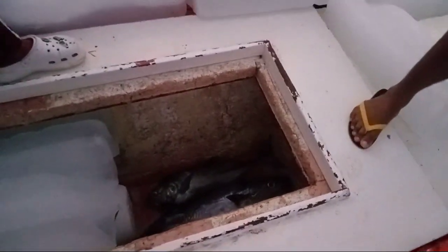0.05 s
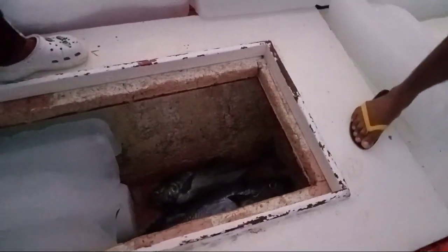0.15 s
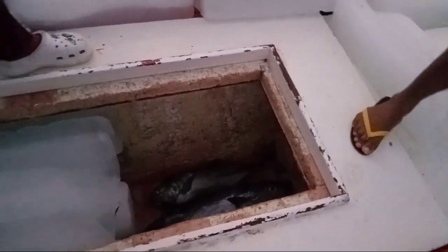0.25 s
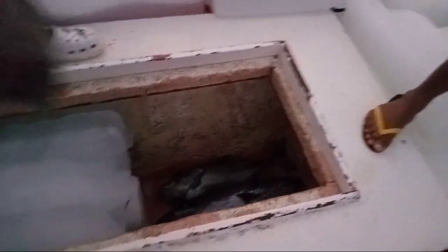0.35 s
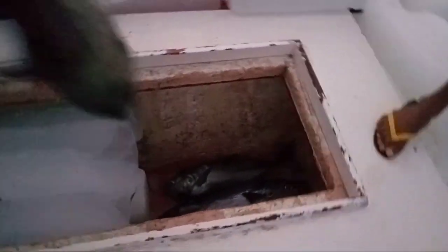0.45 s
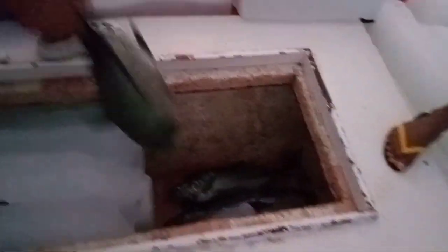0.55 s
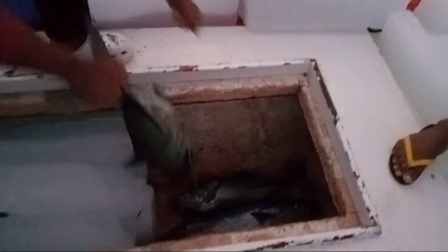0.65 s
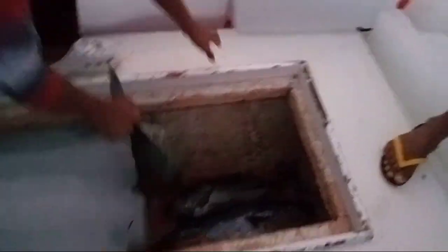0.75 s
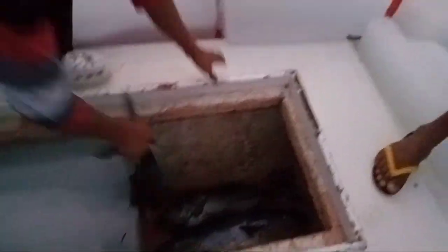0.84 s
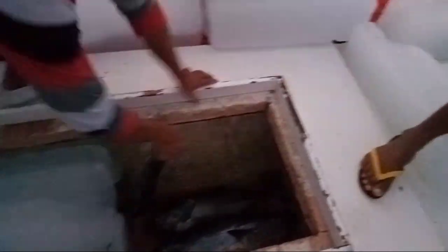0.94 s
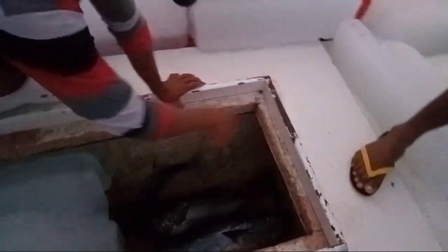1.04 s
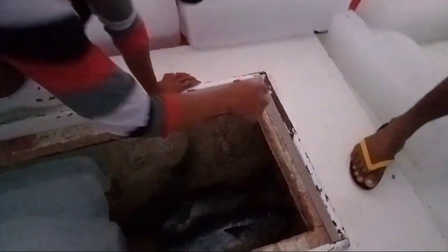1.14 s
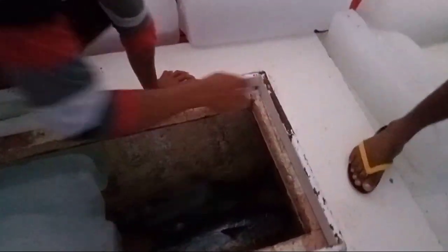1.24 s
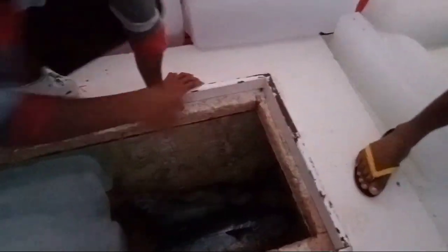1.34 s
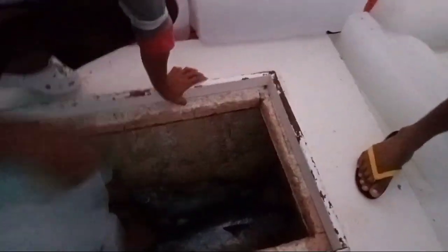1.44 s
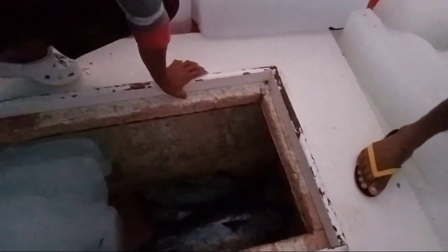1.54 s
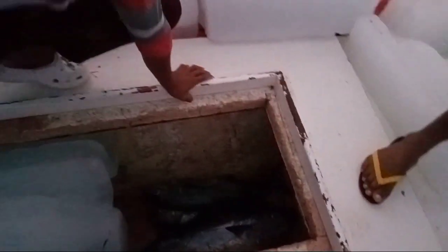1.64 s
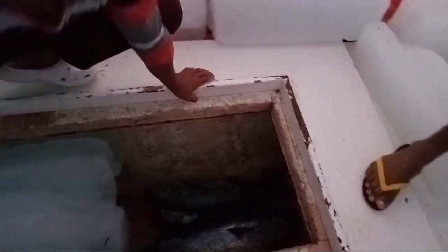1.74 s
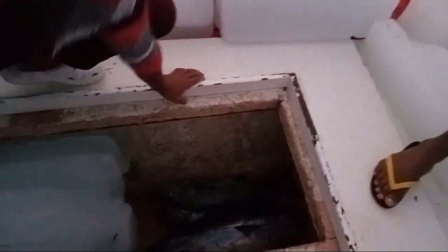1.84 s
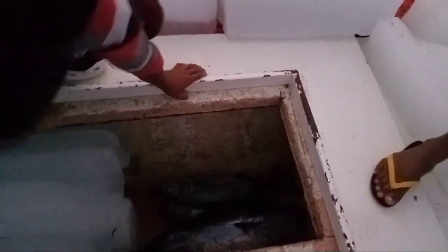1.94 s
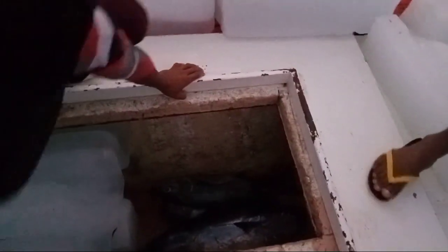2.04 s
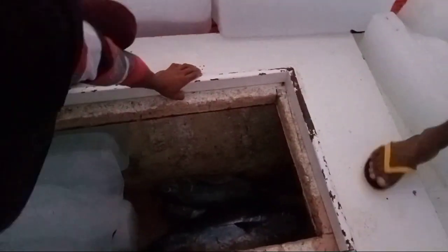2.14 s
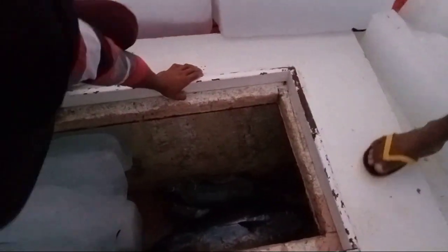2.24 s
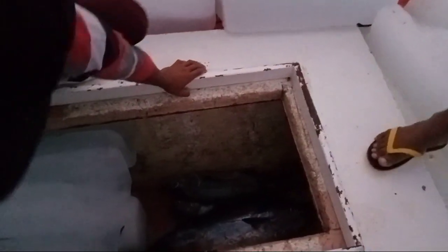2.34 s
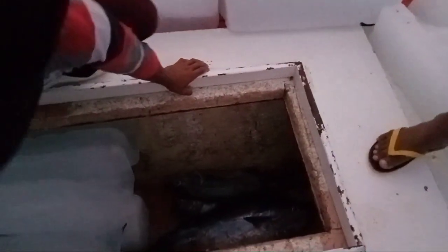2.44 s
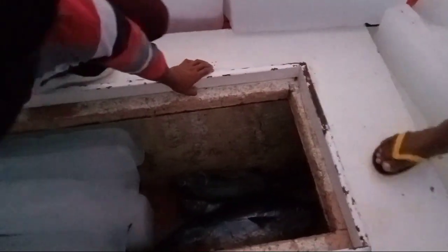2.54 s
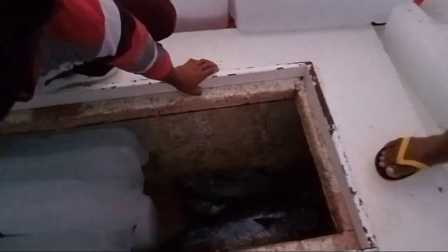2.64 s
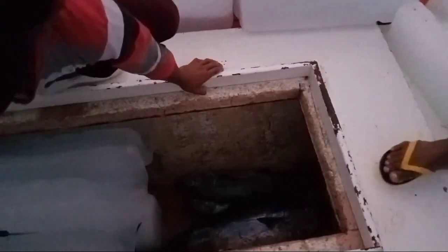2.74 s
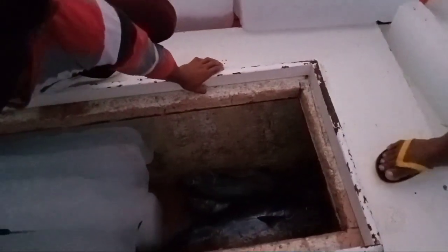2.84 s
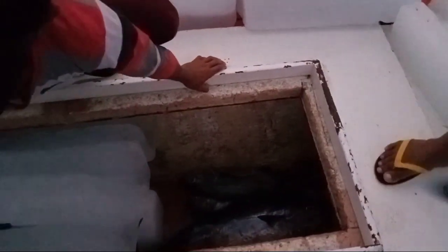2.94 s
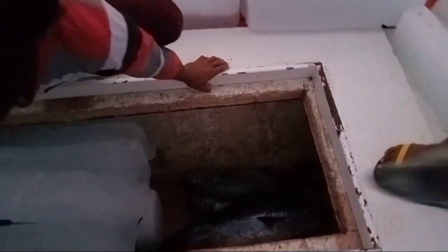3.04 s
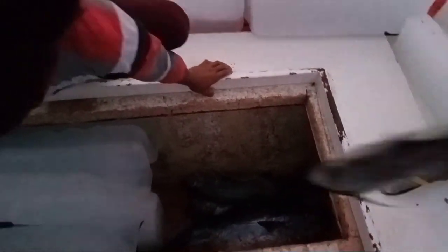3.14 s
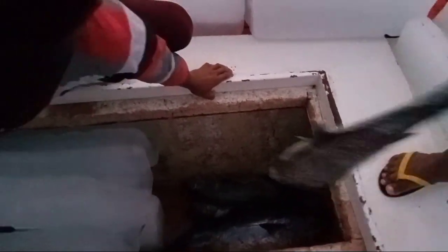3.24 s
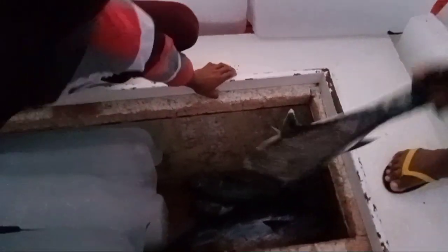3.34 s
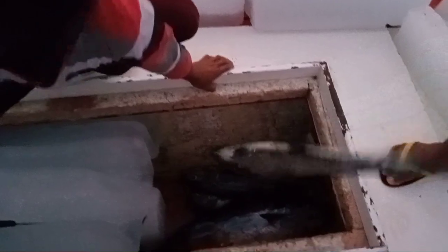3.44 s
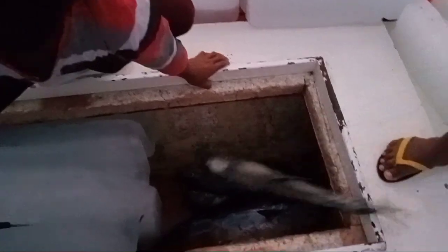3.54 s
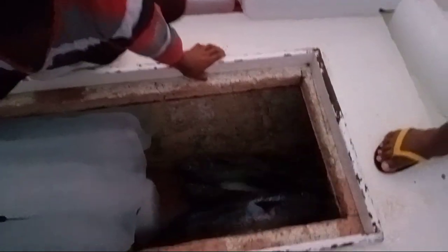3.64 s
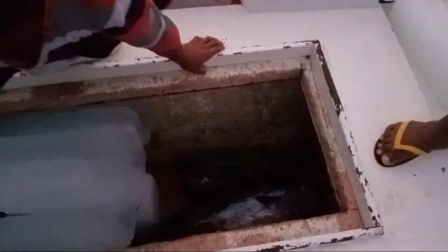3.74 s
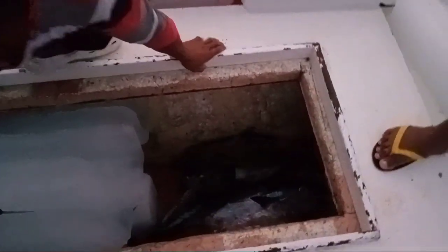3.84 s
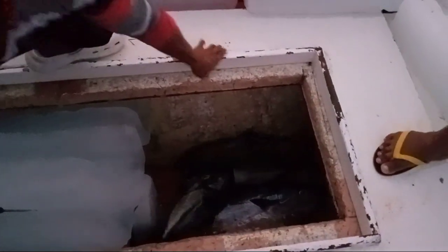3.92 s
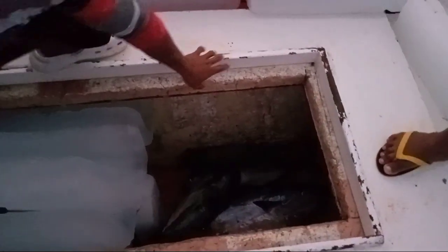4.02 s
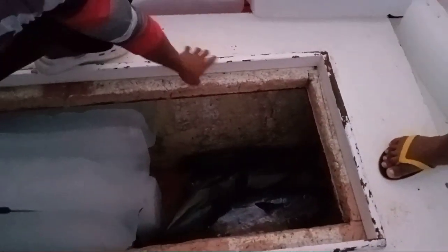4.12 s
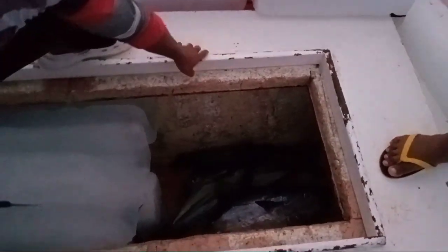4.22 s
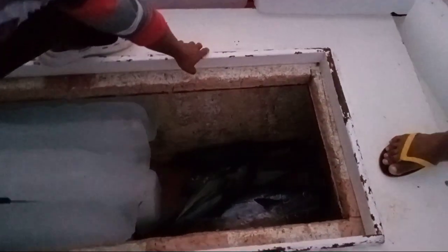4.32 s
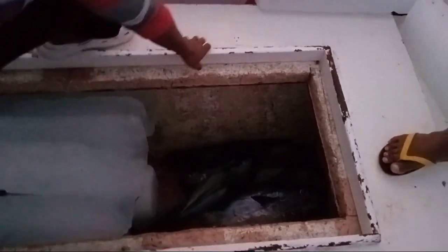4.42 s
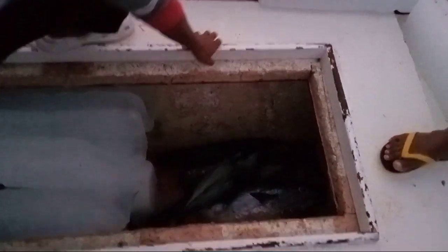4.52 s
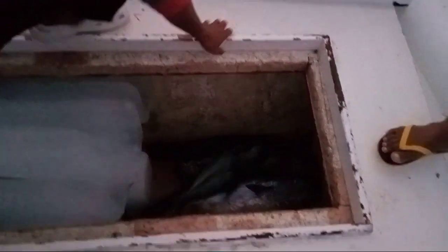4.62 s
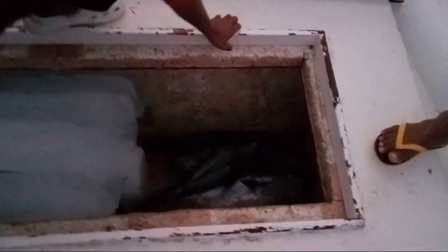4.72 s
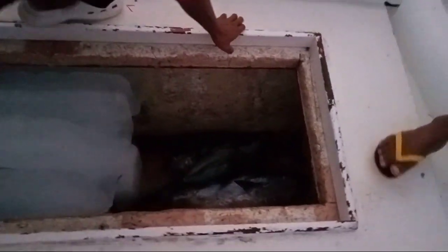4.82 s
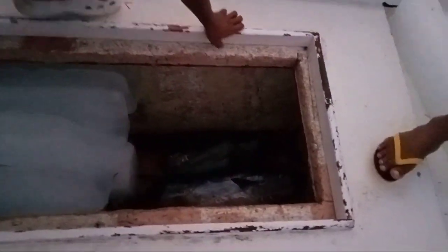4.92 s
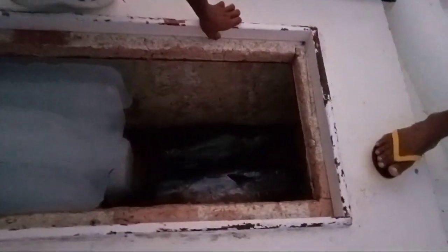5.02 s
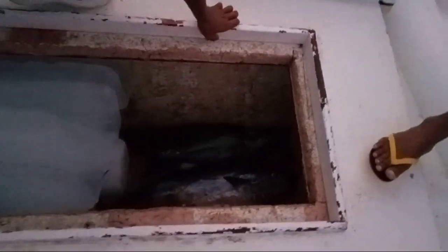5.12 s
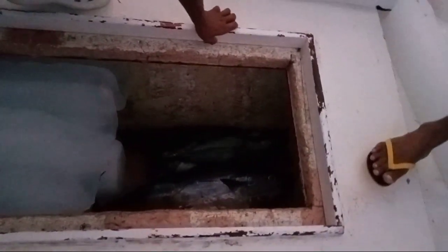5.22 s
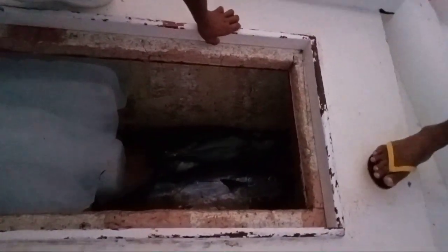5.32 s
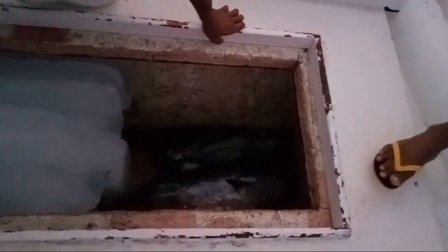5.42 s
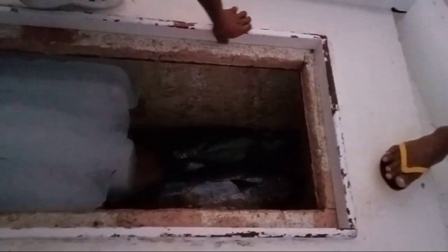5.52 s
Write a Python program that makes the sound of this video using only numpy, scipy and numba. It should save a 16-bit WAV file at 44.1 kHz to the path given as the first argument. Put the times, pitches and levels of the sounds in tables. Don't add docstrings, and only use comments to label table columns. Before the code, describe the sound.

Outdoor, close, rough phone sound: wind puffs thump the microphone over sloshing, gurgling water and faint spray. Brief shoe scuffs and tiny ice clicks come first. One loud, knocking wet slap is followed by a quick falling squeak and smaller slaps. Water and wind carry the middle, with popping bubbles. Then a heavy fish booms into the hollow hold, flopping wetly for half a second, before wind, small laps and a late slap.

```python
import sys
import numpy as np
from scipy import signal
from scipy.fft import rfft, irfft, next_fast_len
from scipy.io import wavfile
from scipy.ndimage import uniform_filter1d
from numba import njit

SR = 44100
rng = np.random.default_rng(int(sys.argv[2]) if len(sys.argv) > 2 else 0)


def volts(x):
    e = np.asarray(x, float) / 20
    return 10 ** e


def log_audio(samples):
    frames = np.atleast_2d(samples).T
    limited = np.clip(frames, -1, 1)
    pcm = np.round(limited * 32767).astype(np.int16)
    wavfile.write(sys.argv[1], SR, pcm)


N = 245637
TIME = np.arange(N) / SR


def unit(x):
    return x / np.sqrt(np.mean(x ** 2))


def along(table):
    s, *columns = np.transpose(table)
    return [np.interp(TIME, s, c) for c in columns]


def walk(rate):
    hold = int(SR / rate)
    steps = np.repeat(rng.standard_normal(N // hold + 1), hold)
    return unit(uniform_filter1d(uniform_filter1d(steps, hold), hold)[:N])


def filtered(x, order, hz, kind):
    return signal.sosfilt(signal.butter(order, hz, kind, fs=SR, output="sos"), x)


@njit
def svf(x, hz, damp):
    y, band, low = np.empty(len(x)), 0., 0.
    for i in range(len(x)):
        g = np.tan(np.pi * hz[i] / SR)
        v = (band + g * (x[i] - low)) / (1 + g * (g + damp))
        band, low, y[i] = 2 * v - band, low + 2 * g * v, damp * v
    return y


def svf3(x, hz, damp):
    return unit(svf(svf(svf(x, hz, damp), hz, damp), hz, damp))


def add(out, s, piece):
    i = int(s * SR)
    out[i:i + len(piece)] += piece[:N - i]


def blip(out, s, db, hz, length, glide, phase):
    half = int(1.5 * length * SR)
    t = np.arange(-half, half) / SR
    tone = np.cos(2 * np.pi * (hz * t * (1 + glide * t / length) + phase))
    add(out, max(s + t[0], 0), volts(db) * np.exp(-4 * (t / length) ** 2) * tone)


# pitch in Hz, density in dB per Hz.
WASH_COLOUR = [(250, -8), (300, 5.5), (407, -8), (600, -11), (1260, -15.5), (2000, -15), (2810, -18.5),
               (3900, -28), (5000, -38.5), (6100, -52.5), (7400, -50.5), (9400, -40.5), (12500, -55),
               (16000, -52)]


def coloured(x, lo_hz, hi_hz):
    hz = np.maximum(np.fft.rfftfreq(N, 1 / SR), 1)
    points, db = np.transpose(WASH_COLOUR)
    tilt = volts(np.interp(np.log(hz), np.log(points), db))
    edges = 1 / np.sqrt((1 + (lo_hz / hz) ** 8) * (1 + (hz / hi_hz) ** 8))
    return unit(irfft(rfft(x) * tilt * edges, N))


def slices(x, flicker_db, rate):
    bands = ((430, 1000), (1000, 6000), (6000, 17000))
    return [coloured(x, lo, hi) * volts(flicker_db * walk(rate)) for lo, hi in bands]


@njit
def bubbles(start, hz, size, cycles, glide):
    out = np.zeros(N)
    for k in range(len(start)):
        steps = int(cycles * SR / hz[k])
        phase = 0.
        for i in range(min(steps, N - start[k])):
            share = i / steps
            phase += 2 * np.pi * hz[k] * (1 + glide * share) / SR
            out[start[k] + i] += size[k] * share * np.exp(-6 * share) * np.sin(phase)
    return out


def froth(count, share, cycles, scatter_db):
    when, pitch, luck = rng.random((count, 3)).T
    hz = 350 * 17 ** pitch
    size = hz * volts(-scatter_db * np.log(luck))
    cloud = bubbles((when * N).astype(np.int64), hz, size, cycles, .06)
    top = filtered(rng.standard_normal(N), 4, 5600, "high")
    return np.sqrt(1 - share) * rng.standard_normal(N) + np.sqrt(share) * (.5 * unit(cloud) + top)


def patchy(x, patch_db, rate):
    size = next_fast_len(N + 4096)
    half_octaves = 2 * np.log2(np.maximum(np.fft.rfftfreq(size, 1 / SR), 1) / 300)
    spectrum, drops = rfft(x, size), np.maximum(walk(90) - 1, 0)
    out = np.zeros(N)
    for k in range(13):
        window = np.cos(np.pi / 2 * np.clip(half_octaves - k, -1, 1)) ** 2
        flutter = walk(rate) + drops * np.maximum(walk(18), 0)
        out += irfft(spectrum * window, size)[:N] * volts(patch_db * flutter)
    return out


# centre in seconds, peak in dB, pitch in Hz.
PUFFS = [(.093, -24.5, 140), (.13, -18, 116), (.688, -20, 148), (.773, -21, 111), (1.107, -14.5, 108.4),
         (1.154, -18, 123), (1.266, -12.5, 160), (1.297, -11, 127), (1.413, -18, 118), (1.767, -15, 152),
         (2.437, -17, 101), (2.567, -29, 140), (2.804, -19.5, 105), (3.137, -19, 112), (3.532, -19, 140),
         (3.821, -14.5, 145), (3.858, -16, 218), (3.957, -15, 161), (4.045, -13, 175), (4.166, -14.5, 190),
         (4.209, -20, 118), (4.259, -16.5, 140), (4.458, -17.5, 172), (4.555, -17, 115), (4.694, -21, 99),
         (4.873, -18.5, 186), (5.067, -20, 112), (5.098, -14.5, 192), (5.142, -14, 227), (5.297, -13, 101)]
# start in seconds, length in seconds, peak in dB, pitch in Hz.
GUSTS = [(0.219, 0.077, -18, 131), (.907, 0.022, -14, 106), (1.188, .018, -14.5, 159),
         (1.678, 0.02, -17, 113), (1.79, 0.031, -13, 156), (1.932, 0.052, -18.5, 129),
         (2.112, 0.039, -16.5, 143), (2.934, 0.064, -19, 140), (3.627, 0.035, -12, 190),
         (3.906, 0.015, -9.5, 170), (3.985, 0.015, -12.5, 140), (4.337, 0.063, -15, 185),
         (4.491, 0.034, -13, 117), (4.732, 0.032, -21, 202), (5.172, 0.031, -16.5, 226),
         (5.328, 0.015, -15, 149), (5.436, 0.034, -19, 156)]


def eddy_rows():
    shed_s, scatter_db, scatter_octaves = .0172, 0.5, 0.29
    rows = list(PUFFS)
    for (s, length, db, f_hz), chance in zip(GUSTS, rng.standard_normal((len(GUSTS), 6, 2))):
        for k, (size, pitch) in enumerate(chance):
            late_db = 40 * max(k * shed_s - length, 0) / shed_s
            eddy_hz = f_hz * 2 ** (scatter_octaves * pitch)
            rows.append((s + k * shed_s, db + scatter_db * size - late_db, eddy_hz))
    return rows


# time in seconds, rumble in dB.
BREEZE = [(0, -57), (.14, -46), (.26, -34.5), (.65, -36.5), (1.1, -29.5), (1.55, -33.5), (1.84, -29),
          (2.06, -41), (2.32, -32.5), (2.62, -46), (3.04, -34.5), (3.27, -32), (3.41, -37.5), (3.8, -24.5),
          (4.64, -36.5), (4.95, -33.5), (5.34, -26.5), (5.57, -31)]


def wind():
    wake_s, wake_db = 0.055, -4
    eddies = rng.standard_normal(N) * volts(4.64 * walk(45))
    centre = np.clip(125 * 2 ** (0.13 * walk(21)), 40, 500)
    slow = unit(svf(rng.standard_normal(N), np.full(N, 64.), 0.45)) * volts(2.2 * walk(7.5))
    puffs, rows = np.zeros(N), eddy_rows()
    for (s, peak_db, f_hz), phase in zip(rows, rng.random(len(rows))):
        blip(puffs, s, min(peak_db, -11), f_hz, 1.25 / f_hz, 0, phase)
    puffs = signal.sosfiltfilt(signal.butter(2, 60, "high", fs=SR, output="sos"), puffs)
    span = int(wake_s * SR)
    wake = np.abs(uniform_filter1d(uniform_filter1d(puffs ** 2, span), span))
    gain = np.sqrt(volts(along(BREEZE)[0]) ** 2 + volts(wake_db) ** 2 * wake)
    rumble = gain * (unit(svf(svf(eddies, centre, 1.76), centre, 1.72)) + volts(-7.0) * slow)
    rumble /= 1 + uniform_filter1d(np.abs(puffs), 400) / (gain * volts(5.5))
    return signal.sosfiltfilt(signal.butter(2, 340, fs=SR, output="sos"), rumble + puffs)


# crest in seconds, ebb in seconds per 10 dB, rustle in dB,
# slosh in dB above it, spray in dB above it.
SURGES = [(0, 0.63, -46.5, -0.5, -18), (.19, 0.19, -43.5, 0.5, -13.5), (.28, 0.22, -43.5, 4, -30),
          (0.539, 0.2, -40.5, 0, -22.5), (.8, 0.3, -44.5, 1, -20.5), (.99, -0.15, -45, 7.5, -8),
          (1.244, 0.2135, -37, 0.5, -19), (1.719, 0.3, -46, -15, -16), (1.98, 0.2, -47.5, -5.5, -25),
          (2.37, 0.5, -47, 3, -39), (2.44, 0.2741, -41.5, 5, -22.5), (2.6, 0.3, -43.5, -1.5, -19.5),
          (2.76, 0.25, -44.5, -9, -19), (2.9, 2, -54.5, -3, -14), (3.34, -0.02, -59.5, 29, -19),
          (3.507, 0.04, -35, -1.5, -17), (3.802, 0.16, -38.5, 6, -18), (3.89, 0.2042, -38, 2.5, -13.5),
          (4.15, 0.39, -41, 0.5, -20.5), (4.42, 0.26, -47.5, 9.5, -18), (4.72, 0.13, -44, 1, -20),
          (5.2, 1, -53.5, 1, -15.5), (5.32, 0.1, -56.5, 15, -15), (5.38, -0.02, -44, -13, -25),
          (5.45, -0.07, -47, -7, -22), (5.57, 3, -70, -12, -30)]
# slosh, rustle and spray in dB.
LULL_DB = (-67, -55, -77)
# centre in seconds, peak in dB, pitch in Hz.
BUBBLES = [(.269, -30.5, 553), (.276, -33.5, 1490), (.311, -31, 790), (.504, -34, 1497), (.506, -32, 622),
           (.859, -33.5, 666), (1.094, -35, 3120), (1.394, -27, 2820), (1.503, -35.5, 814),
           (2.382, -30.5, 1055), (2.54, -34.5, 730), (3.318, -30.5, 1047), (3.704, -34, 4100),
           (3.706, -32.5, 2440), (3.776, -30.5, 2940), (3.833, -33, 2880), (3.996, -29, 1610),
           (4.021, -27, 2540), (4.146, -38.5, 3550), (4.273, -34.5, 976), (4.431, -34.5, 584),
           (4.531, -34, 1250), (4.514, -35, 2050), (4.537, -32, 1480), (4.668, -38, 2180),
           (4.811, -41, 924)]
# centre
# in seconds, peak in dB, pitch in Hz.
POCKETS = [(.885, -28, 367), (1.395, -26, 350), (1.5, -28, 344), (2.416, -21, 367), (2.87, -33, 269),
           (3.215, -36, 515), (3.322, -14.5, 246.5), (3.803, -18.5, 393), (3.866, -17.5, 334),
           (4.012, -21, 800), (4.089, -26, 356), (4.145, -22.5, 320), (4.618, -33.5, 905),
           (4.397, -20.5, 335), (4.677, -29.5, 480), (5.123, -24.5, 634), (5.174, -26, 1240)]


def wash():
    rise_share = 0.47
    bubble_s, pocket_s, ring_fall = 0.025, 0.0076, 0.6
    power = np.outer(volts(np.array(LULL_DB)) ** 2, np.ones(N))
    for crest, ebb, db, slosh_db, spray_db in SURGES:
        away = np.maximum(TIME - crest, (crest - TIME) / rise_share) / max(ebb, .01)
        swell = volts(db - 10 * away ** 1.4)
        power += np.outer(volts(np.array([slosh_db, 0, spray_db])), swell) ** 2
    water = froth(count=6000, share=.45, cycles=45., scatter_db=1.7)
    out = np.sum(np.sqrt(power) * slices(water, flicker_db=1.2, rate=40), axis=0)
    out = patchy(out, patch_db=2.3, rate=22) * volts(-1.5)
    pops = np.zeros(N)
    for table, ring_s in ((BUBBLES, bubble_s), (POCKETS, pocket_s)):
        for (s, peak_db, f_hz), phase in zip(table, rng.random(len(table))):
            blip(pops, s, peak_db, f_hz, ring_s * (1000 / f_hz) ** ring_fall, .02, phase)
    return out + pops * volts(2 * walk(200) + 2 * walk(700) - .5)


# time in seconds, peak in dB, body in dB above it,
# sizzle in dB above it.
LAPS = [(0.029, -31.5, -6, -15), (1.59, -34.5, 1.5, -8), (1.755, -30.5, 6.5, -30), (1.793, -27, 1, -41),
        (1.814, -36, 7, -16), (1.939, -30, 2.5, -14), (2.109, -37, 12, -34), (2.132, -33, 0, -42),
        (2.374, -42.5, 3, -35), (2.399, -28.5, 8.5, -31), (3.082, -30.5, -24, -14), (3.136, -33, 1, -23),
        (3.3078, -24.5, 3.5, -55), (4.332, -27, 9, -32), (4.413, -30, -13, -20), (4.511, -28, 1, -31),
        (4.6134, -29, -32, -20), (5.3965, -28.5, -27, -17), (5.44, -30.5, 8.5, -14.5),
        (5.5428, -37, -1, -35)]
# time in seconds, peak in dB, body in dB above it,
# sizzle in dB above it.
SLAPS = [(1.08, -24, -2.5, -17.5), (1.188, -19.5, -14, -2), (1.192, -5.5, 1, -31), (1.225, -23, 8.5, -20),
         (1.39, -19, -5, -11.5), (1.412, -22, -24, -12), (1.484, -21, -6, -28), (1.5276, -25, -25, -15),
         (3.473, -31, 13, -15), (3.498, -24.5, 0, -19), (3.518, -28.5, -16, -11), (3.5633, -34.5, 10, -7),
         (3.622, -17, 10, -23), (3.644, -14.5, 3, -17), (3.697, -22, -24, -13.5), (3.769, -20.5, -18, -9),
         (3.7994, -22.5, 2, -45), (3.83, -24, 5, -5), (3.8531, -20.5, 6, -7), (3.89, -13, -3, -17.5),
         (3.909, -19.5, 4, -15), (3.977, -15.5, 0, -20), (4.005, -20, 17, -40), (4.08, -26, -3, -24),
         (4.141, -27.5, -17, -19), (5.1021, -19, -3.5, -12.5), (5.113, -21.5, 3.5, -35),
         (5.172, -26, 6.5, -18)]


def laps_and_slaps():
    t60 = 0.14
    t = np.arange(int(t60 * SR)) / SR
    pressed = np.maximum(t - 0.08 * t60, 0)
    envelopes = np.zeros((3, N))
    for table, rise in ((LAPS, 0.0059), (SLAPS, 0.0024)):
        for s, db, body_db, sizzle_db in table:
            shape = np.minimum(t / rise, 1) * volts(db - 11.5 - 60 * pressed / t60)
            for row, gain_db in zip(envelopes, (min(body_db, 10), 0, sizzle_db)):
                add(row, s - 0.64 * rise, (shape * volts(gain_db)) ** 2)
    wet = froth(count=16000, share=.45, cycles=30., scatter_db=1.5) * volts(1.4 * walk(300))
    body, middle, sizzle = np.sqrt(envelopes) * slices(wet, flicker_db=0.5, rate=100)
    crackle = sizzle * volts(2.0 * walk(500))
    return patchy(body + middle + crackle, patch_db=2.6, rate=90) * volts(-1.5)


# crest in seconds, length in seconds, level in dB.
MISTS = [(0.142, .08, -68), (0.363, 0.11, -63), (.72, 0.16, -70.5), (1.003, 0.065, -63), (1.61, 0.036, -68),
         (1.716, 0.045, -61), (1.943, 0.014, -60), (2.62, .1, -67), (4.47, 0.022, -66), (5.05, .08, -69),
         (5.25, 0.085, -70)]


def mist():
    drops = rng.standard_normal(N) * volts(1.5 * walk(400))
    drops = unit(filtered(drops, 3, [10500, 15500], "band"))
    return drops * sum(volts(db) * np.exp(-((TIME - s) / length) ** 2) for s, length, db in MISTS)


# time in seconds, peak in dB,
# middle in dB above it.
TICKS = [(.124, -50, -5), (.164, -34.5, 4), (.3865, -36, -8), (.592, -37, -8), (.636, -43, -10),
         (.705, -53, -10), (.727, -47, -21), (.752, -69, -21), (.8026, -28, 0), (.9667, -36, -10),
         (0.9847, -40, -8), (1.1927, -28, 0), (1.374, -35, -1), (1.4123, -26, 1), (1.43, -40, -5),
         (1.5246, -40, -4.5), (1.5474, -46, -5), (1.5853, -46, 10), (1.648, -45.5, 12), (1.785, -46, 0),
         (1.819, -45, 5), (1.845, -52, 8), (1.937, -33.5, -1), (2.191, -44, -5), (2.2333, -49, -7),
         (2.2668, -26, 4), (2.756, -42, -5), (2.8665, -37, -13), (2.965, -44, 10), (2.998, -38, 3.5),
         (3.087, -41, 9), (3.4511, -49.5, 8), (3.5688, -42, 4), (3.7683, -29, 2), (3.814, -31, -5),
         (3.828, -36, -5), (3.865, -33, 5), (3.891, -36, -1), (3.945, -44, -10), (3.976, -42, 8),
         (4.0841, -38, 5), (4.134, -38, 4), (4.6214, -48, 3), (4.667, -60.5, 11), (4.686, -60, 8),
         (4.9531, -43, -2), (5.1387, -39, -3), (5.1647, -46, 2), (5.1851, -50, 3), (5.2769, -52, -5),
         (5.485, -65, 5)]


def ticks():
    t60 = 0.0093
    top, middle = np.zeros((2, N))
    step = np.arange(600)
    for (s, db, middle_db), grit in zip(TICKS, rng.standard_normal((len(TICKS), 600))):
        click = grit * volts(db - 60 * step / SR / t60) * np.minimum(step / 10, 1)
        add(top, s, click)
        add(middle, s, click * volts(middle_db + 6.0))
    return filtered(top, 2, [8000, 13000], "band") + filtered(middle, 2, [1200, 3800], "band")


# start in seconds, length in seconds, level in dB,
# rasp in Hz, sizzle in dB above it.
SCUFFS = [(.17, 0.047, -40, 3520, -10), (0.37, 0.051, -36.5, 3080, -15.5),
          (0.582, 0.043, -37.5, 3340, -7.5), (0.8, 0.033, -32.5, 3600, -14), (0.74, 0.0088, -44, 4100, -15),
          (4.685, 0.019, -33.5, 1950, -40), (4.682, 0.021, -37, 2600, -34), (3.95, 0.043, -40.5, 3000, -5),
          (1.5, .012, -46, 3000, -2), (4.665, 0.011, -40, 2200, -30), (5.535, .034, -47.5, 3300, -28)]


def scuffs():
    out = np.zeros(N)
    sizzle = coloured(rng.standard_normal(N), 8300, 13000)
    judder = volts(1.3 * walk(350))
    for s, length, db, rasp_hz, sizzle_db in SCUFFS:
        grit = rng.standard_normal(int(length * SR))
        rasp = svf3(grit, np.full(len(grit), 1. * rasp_hz), .26)
        here = slice(int(s * SR), int(s * SR) + len(grit))
        drag = volts(db) * np.hanning(len(grit)) ** 0.47 * judder[here]
        out[here] += drag * (rasp + volts(sizzle_db) * sizzle[here])
    return out


# time in seconds, pitch in Hz,
# level in dB.
WHISTLES = [
    [(.3, 12000, -76), (.36, 13500, -67), (.5, 13700, -67), (.54, 13500, -80)],
    [(4.99, 12200, -74), (5.05, 13700, -67), (5.28, 13600, -67), (5.34, 12300, -76)],
]


def whistles():
    out = np.zeros(N)
    for table in WHISTLES:
        hz, db = along(table)
        inside = (TIME > table[0][0]) * (TIME < table[-1][0])
        out += inside * volts(db + 3 * walk(40) - 3) * unit(svf(rng.standard_normal(N), hz, .05))
    return out


def knocks(modes, blows, push_s):
    out = np.zeros(N)
    t = np.arange(int(.3 * SR)) / SR
    push = np.hanning(int(push_s * SR) + 3)
    for (s, db), chances in zip(blows, rng.standard_normal((len(blows), len(modes)))):
        ring = np.zeros(len(t))
        for (hz, mode_db, t60), chance in zip(modes, chances):
            decay = volts(mode_db + 2.0 * chance - 60 * t / min(t60, .09))
            ring += decay * np.sin(2 * np.pi * hz * (1 + 0.0079 * chance) * t)
        add(out, s, volts(db) * np.convolve(ring, push / push.sum()))
    return out


# pitch in Hz, level in dB, t60 in seconds.
RIM = [(350, -18, 0.53), (744, 0.5, 0.058), (1130, -33, 0.15), (1550, -33, 0.063), (1820, -5, 0.051),
       (1893, -18, 0.13), (3300, -19, 0.4), (4830, -25, 0.11)]
# time in seconds, level in dB.
RIM_BLOWS = [
    (1.192, -45),
    (1.1965, -2.5),
    (1.206, -13),
]


def rim():
    return knocks(RIM, RIM_BLOWS, push_s=0.00025)


# time in seconds, pitch in Hz, level in dB.
SQUEAK = [(1.287, 3050, -27), (1.294, 2904, -26), (1.303, 2612, -29.5), (1.308, 2474, -16),
          (1.314, 2330, -22), (1.319, 2080, -20.5), (1.333, 1805, -21), (1.346, 2020, -28),
          (1.364, 1700, -34)]


def squeak():
    hz, db = along(SQUEAK)
    phase = 2 * np.pi * np.cumsum(hz * (1 + 0.034 * walk(900))) / SR
    rub = 0.3 * svf3(rng.standard_normal(N), hz, .2)
    inside = uniform_filter1d(1. * (TIME > SQUEAK[0][0]) * (TIME < SQUEAK[-1][0]), 200)
    octave = volts(-19 + 4 * walk(300)) * np.clip(1900 / hz, 0, 1) * np.sin(2 * phase)
    upper = volts(-43) * (np.sin(3 * phase) + np.sin(4 * phase) + np.sin(5 * phase))
    return inside * volts(db + 2.5 + 2.5 * walk(300)) * (np.sin(phase) + octave + upper + rub)


# pitch in Hz, level in dB, t60 in seconds.
HOLD = [(140, 2, .12), (288, -2.5, .1), (422, -5, 0.1), (590, -41, .07)]
# time in seconds, level in dB.
HOLD_BLOWS = [
    (3.62, -8),
    (3.643, -11.5),
    (3.656, -14.5),
    (3.995, -13.5),
]


def hold():
    return knocks(HOLD, HOLD_BLOWS, push_s=0.0011)


def scene():
    air = wind() + whistles()
    water = wash() + mist()
    fish = laps_and_slaps() + rim() + squeak() + hold()
    return (air + water + fish + ticks() + scuffs())[None]


def roll_off(x):
    return signal.sosfilt(signal.butter(12, 16440, fs=SR, output="sos"), x)


def record(dry):
    x = filtered(dry, 3, 58, "high")
    x = np.tanh(1.1 * x) / 1.1
    x = signal.sosfilt(signal.ellip(10, .2, 90, 15700, fs=SR, output="sos"), x)
    return roll_off(x)


dry = scene()
out = record(dry)
log_audio(out)
```